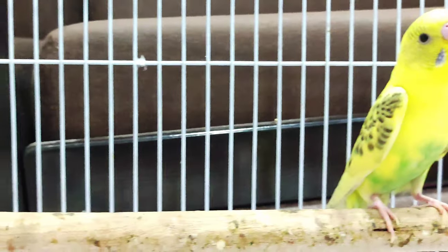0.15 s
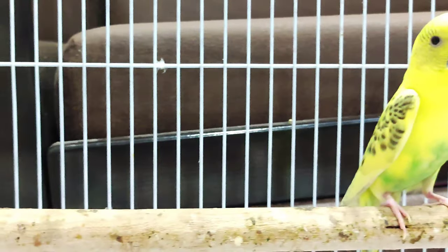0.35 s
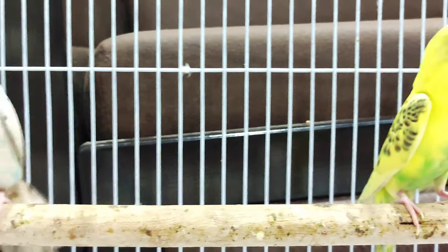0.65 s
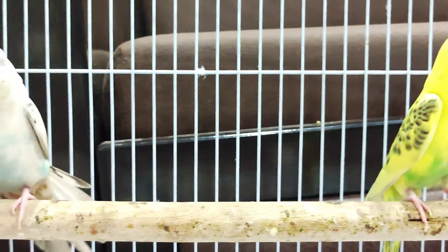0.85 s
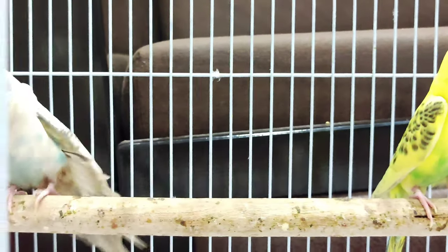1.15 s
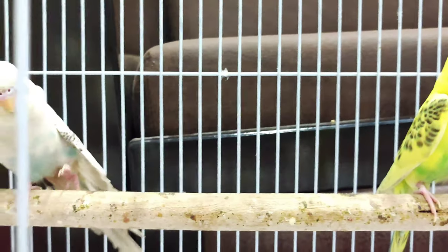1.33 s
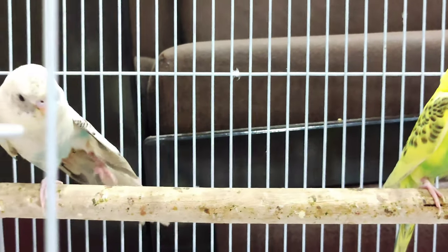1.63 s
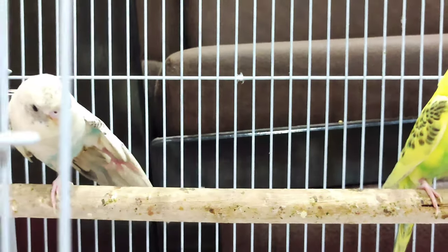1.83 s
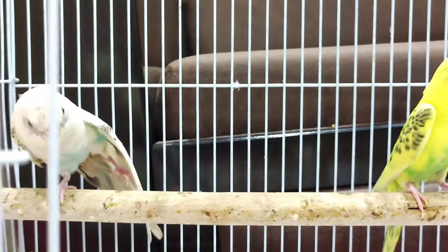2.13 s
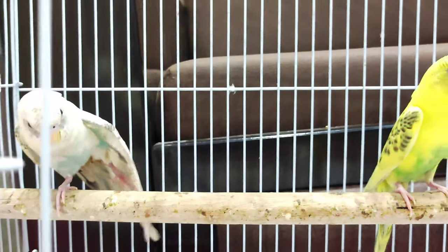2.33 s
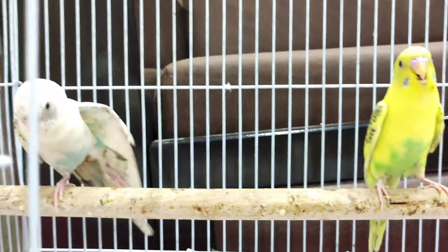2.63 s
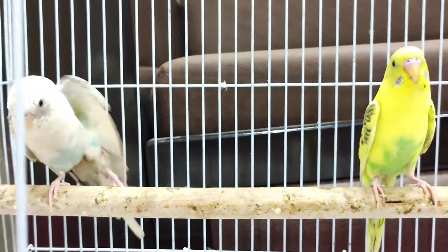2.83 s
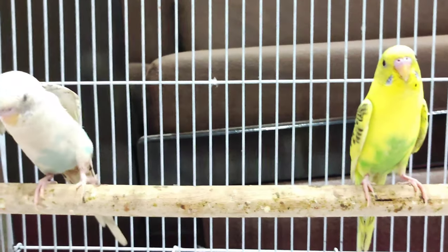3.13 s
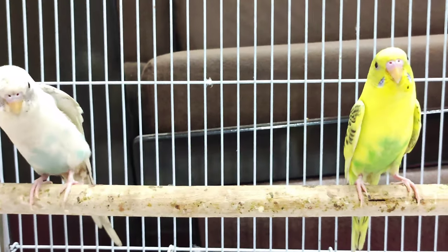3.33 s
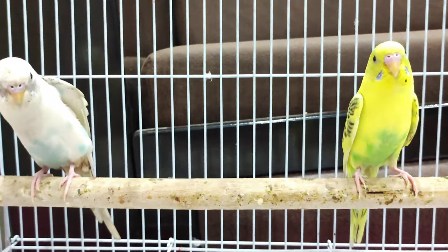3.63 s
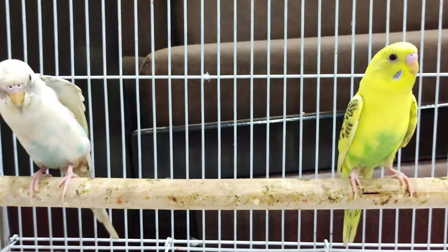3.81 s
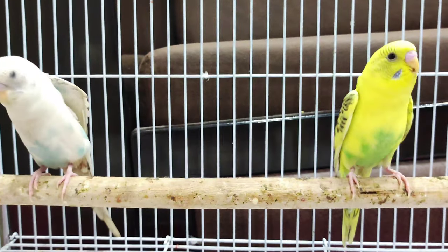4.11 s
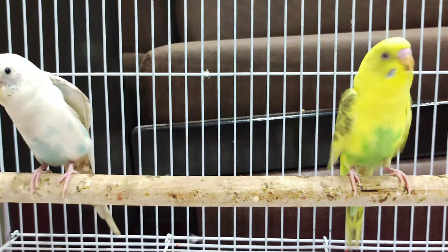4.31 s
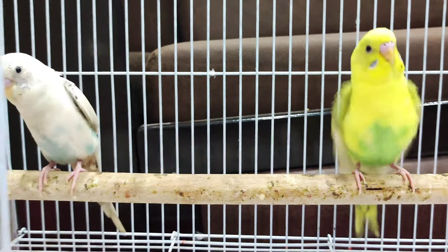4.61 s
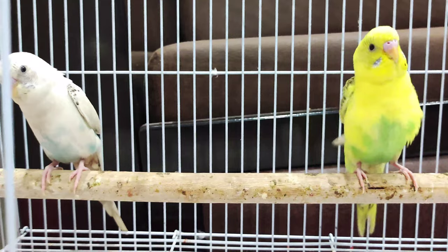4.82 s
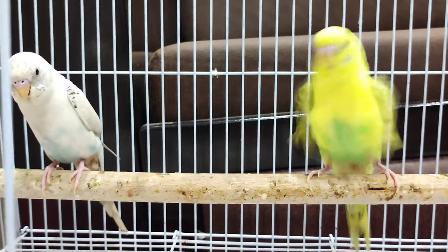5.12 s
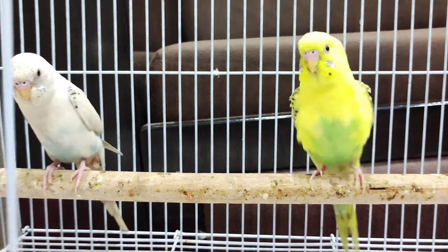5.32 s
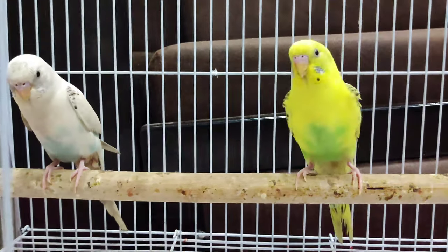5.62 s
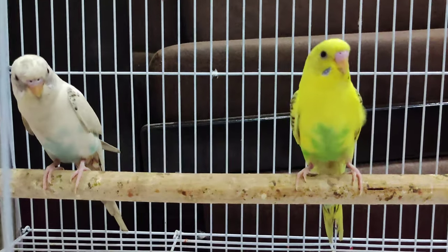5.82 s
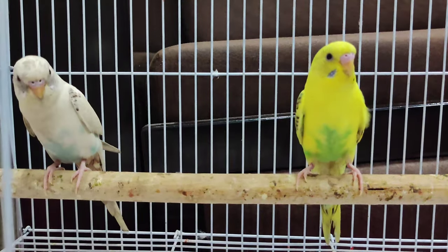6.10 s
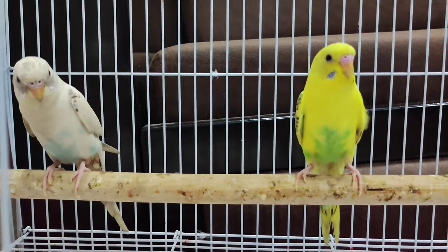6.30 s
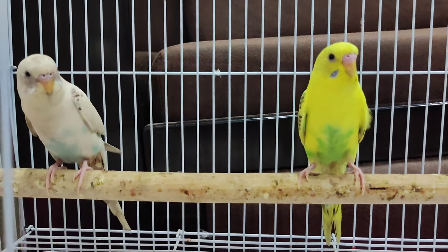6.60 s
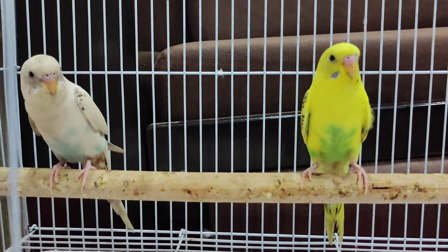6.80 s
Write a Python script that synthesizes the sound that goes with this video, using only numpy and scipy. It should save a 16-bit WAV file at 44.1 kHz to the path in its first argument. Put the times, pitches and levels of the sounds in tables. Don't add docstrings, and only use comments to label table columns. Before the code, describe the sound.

Indoors, a budgerigar in a wire cage gives five short, loud, gliding warbles close to a phone microphone: one early, two together mid-way, two more later. Fainter birds chirp from across the room. Low hum and hiss lie beneath, with dull cloth rubs, low furniture thuds and tiny claw ticks. Feathers flutter in soft hisses, and distant chatter and light brushing finish.

```python
import sys
import numpy as np
from scipy import signal
from scipy.fft import rfft, irfft, next_fast_len
from scipy.io import wavfile
from scipy.ndimage import uniform_filter1d, map_coordinates

SR = 44100
rng = np.random.default_rng(int(sys.argv[2]) if len(sys.argv) > 2 else 0)


def bounce(signal):
    frames = np.transpose(np.atleast_2d(signal))
    limited = np.clip(frames, -1, 1)
    pcm = np.round(limited * 32767).astype(np.int16)
    wavfile.write(sys.argv[1], SR, pcm)


def nominal_scale(level):
    x = np.asarray(level, float) / 20
    return 10 ** x


N = 306495


def unit(x):
    return x / np.sqrt(np.mean(x ** 2) + 1e-20)


def along(points, hz):
    f, v = np.transpose(points)
    return np.interp(np.log(hz + 1), np.log(f + 1), v)


def wobble(rate, size=N):
    knots = rng.standard_normal(int(size * rate / SR) + 4)
    return map_coordinates(knots, [np.arange(size) * rate / SR])


def patches(shape, bins, frames):
    field = uniform_filter1d(rng.standard_normal(shape), size=bins, axis=0)
    return unit(uniform_filter1d(field, size=frames, axis=1))


def filtered(x, response):
    m = next_fast_len(x.shape[-1] + SR // 4)
    return irfft(rfft(x, m) * response(np.fft.rfftfreq(m, 1 / SR)), m)[..., :x.shape[-1]]


def shaped(x, curve):
    return filtered(x, lambda hz: nominal_scale(along(curve, hz)))


def rush(spectrum, alike, patchy_db):
    z = signal.stft(rng.standard_normal((2, N)), nperseg=512)[2]
    gain = nominal_scale(patchy_db * patches(z.shape[1:], 6, 10))
    pair = signal.istft(z * gain, nperseg=512)[1][:, :N]

    def mid_side(hz):
        turn = np.arccos(np.clip(along(alike, hz), -1, 1)) / 2
        return nominal_scale(along(spectrum, hz)) * [np.cos(turn), np.sin(turn)]

    mid, side = filtered(pair, mid_side)
    return unit(np.array([mid + side, mid - side]))


def add(out, x, s):
    i = round(s * SR)
    out[:, i:i + x.shape[1]] += x[:, :N - i]


def background():
    # time in seconds, level in dB.
    hum_swell = [(0.0, -55.5), (0.29, -58.5), (0.68, -53), (1.57, -57.5), (2.69, -55.5), (3.48, -59.5),
                 (5.92, -55), (6.95, -57)]
    # frequency in Hz, density in dB per Hz.
    hum_tone = [(12, -37.5), (20, -8), (27, -2.5), (53, -2.5), (75, -12.5), (107, -0.5), (141, -8),
                (182, 1.5), (203, -7.5), (222, -14.5), (282, -8.5), (451, -33), (600, -28.5), (780, -43.5),
                (1320, -120)]
    hiss_tone = [(240, -42.5), (400, -6.5), (438, -13.5), (612, -13.5), (854, -16), (1190, -16.5),
                 (1270, -19.5), (2220, -19), (3290, -22.5), (4460, -25.5), (6610, -28.5), (13700, -23),
                 (14800, -44.5)]
    # frequency in Hz, likeness from 0 to 1.
    likeness = [(30, 0.43), (60, 0.55), (180, 0.9), (350, 0.63), (700, 0.0015), (1650, 0), (5000, 0.029)]
    swell = nominal_scale(np.interp(np.arange(N) / SR, *np.transpose(hum_swell)))
    hum = swell * nominal_scale(2.5 + 0.51 * wobble(54)) * rush(hum_tone, likeness, patchy_db=-2.5)
    hiss_db = -63 + 0.45 * wobble(3.6)
    return hum + nominal_scale(hiss_db) * rush(hiss_tone, likeness, patchy_db=-4.5)


def contact_call(db, pitch_hz, rhythm, accents, bends=(0, 0, 0, 0)):
    warble_hz, held_hz, low_hz = pitch_hz
    slide, dip, arch, held, low = rhythm
    slide_db, dip_db, held_db, low_db, rise_db = accents
    crack, stroke, rise, pause = .004, .007, .023, .004
    flight = arch * np.array([0, .5, 1])
    arch_hz = warble_hz + 90e3 * flight - 4.9e6 * flight ** 2
    hz = [np.add((3200, 2860, 2537), [*bends[:2], 0]),
          warble_hz + np.array((1300, 750, 350)),
          warble_hz + np.array((280, -120, 0)),
          arch_hz,
          np.linspace(3900, held_hz, 3),
          held_hz - 70 * np.array([1, 0, 1]),
          [1990, low_hz, low_hz],
          np.add((2796, 3200, 3606), [0, *bends[2:]])]
    length = np.array([slide, crack, dip - crack, arch, stroke, held - stroke, low, rise])
    slot = length + pause * np.array([0, 0, 0, 1, 0, 0, 1, 0])
    gain_db = db + np.array([slide_db, -12, dip_db, 0, -3, held_db, low_db, rise_db])
    return np.column_stack([np.cumsum(slot) - slot, length, hz, gain_db])


def glides(rows, s):
    start, length, a, b, db = np.transpose(rows)
    return np.column_stack([start - s, length, a, (a + b) / 2, b, db])


def warble(notes, rasp, overtone_db, sheen_db):
    reed = [0, -23, -44, -34, -44]
    # frequency in Hz, gain in dB.
    throat = [(1000, -46), (1900, -39), (2150, -28), (2450, -3), (3600, 0), (4300, -2), (5200, 0),
              (6200, -5), (7200, -10), (10500, -12), (13500, 1), (15000, -4)]
    # frequency in Hz, density in dB per Hz.
    breath_tone = [(530, -66), (900, -40.5), (1460, -24.5), (1580, -41.5), (1810, -23.5), (2370, -8),
                   (2730, -17.5), (3150, -9), (3640, -16.5), (4710, -12.5), (10500, -53.5), (13600, -78.5),
                   (22000, -120)]
    # frequency in Hz, gain in dB.
    sheen_tone = [(4000, -50), (5500, -36), (8000, 3), (10000, -7), (11000, -14), (12200, 9.5),
                  (13500, 7.5), (14300, 0.5), (15000, -34)]
    tone, breath = np.zeros(SR), np.zeros(SR)
    order = np.arange(1, len(reed) + 1)[:, None]
    first = notes[0][0]
    for s, length, *hz, db in notes:
        n, i = int(length * SR), int(s * SR)
        u = np.arange(n) / n
        rough = rasp * (1 + 1.1 * (hz[1] < 2300))
        glide = np.polyval(np.polyfit([0, .5, 1], hz, 2), u)
        pitch = glide * (1 + .06 * rough * wobble(500, size=n))
        second_db = overtone_db - 6.5 * (s > first and hz[1] > 2300)
        gains = nominal_scale(np.array(reed)[:, None] + along(throat, order * pitch) + second_db * (order == 2))
        voice = (gains * np.sin(order * 2 * np.pi * np.cumsum(pitch) / SR)).sum(0)
        edge = np.clip(np.minimum(u / .12, (1 - u) * length / .001), 0, 1)
        effort = nominal_scale(db + 2.2 * wobble(90, size=n) + 10 * rough * wobble(600, size=n)) * edge
        tone[i:i + n] += unit(voice) * effort
        snap = 1 + 3 * np.exp(-u * length / 0.005) * (hz[0] > 3850)
        opening = np.clip(.25 + (s - first + u * length) / .05, 0, 1)
        breath[i:i + n] += effort * snap * (rough / rasp) * opening
    air = unit(shaped(rng.standard_normal(SR), breath_tone))
    z = signal.stft(rng.standard_normal(SR), nperseg=256)[2]
    mottled = signal.istft(z * nominal_scale(5 * patches(z.shape, 10, 14)), nperseg=256)[1][:SR]
    sheen = unit(shaped(mottled, sheen_tone))
    lingering = signal.lfilter([.002], [1, .002 - 1], breath)
    return tone + rasp * air * uniform_filter1d(breath, size=60) + nominal_scale(sheen_db) * sheen * lingering


def place(x, pan_db, lead_ms):
    side = np.array([[1], [-1]])
    return filtered(x, lambda hz: nominal_scale(side * pan_db / 2) * np.exp(1j * np.pi * hz * side * lead_ms / 1000))


def room(x, wet_db):
    # frequency in Hz, time to fall 60 dB in seconds.
    ring_time = [(500, 0.2), (2000, 0.84), (3500, 0.51), (6000, 0.73), (9000, 0.34), (13000, 0.32)]
    # delay in seconds, level in dB.
    echoes = [(.0023, -2), (.0051, 0), (.0087, -2), (.0132, -1), (.019, -4), (.027, -5)]
    hz, t, z = signal.stft(rng.standard_normal((2, SR * 3 // 4)), SR, nperseg=256)
    decay = nominal_scale(-60 * t / along(ring_time, hz)[:, None]) * np.clip(t / 0.017, 0, 1)
    tail = signal.istft(z * decay, SR, nperseg=256)[1]
    tail = tail / np.linalg.norm(tail[0])
    delay, db = np.transpose(echoes)
    for side in tail:
        at = np.abs(delay * SR * rng.uniform(.8, 1.2, len(db))).astype(int)
        side[at] += nominal_scale(db) * rng.choice([-1, 1], len(db))
    return nominal_scale(wet_db) * signal.fftconvolve(x[None], tail, axes=1)[:, :len(x)]


def far_birds():
    # start in seconds, arch level in dB, tempo, stress on the held note in dB, left-right in dB.
    far_calls = [
        (.022, -43, 0.62, 5, -5),
        (.27, -46.5, 0.62, 4.1, -5.5),
        (1.043, -45, 0.67, 4.5, -5),
        (2.173, -46.5, 0.67, 9.5, -4.5),
        (2.404, -48.5, 0.66, 6.5, -5),
        (4.074, -46.5, 0.73, 5.5, -6),
    ]
    # start in seconds, length in seconds, start pitch in Hz, end pitch in Hz, level in dB.
    tunes = [
        [(1.225, 0.029, 3215, 2560, -48), (1.262, 0.022, 3553, 3330, -36), (1.3, 0.012, 3200, 2860, -48),
         (1.328, 0.015, 3575, 3620, -40)],
        [(2.31, 0.21, 5060, 5000, -57), (2.45, 0.082, 4740, 5300, -77), (2.49, 0.037, 3020, 3043, -71)],
        [(5.998, 0.047, 3116, 2765, -47), (6.05, 0.029, 3200, 3120, -39.5), (6.075, 0.033, 3500, 3900, -48),
         (6.102, .026, 3027, 2960, -33), (6.13, 0.038, 3800, 3756, -45), (6.56, 0.035, 3070, 2950, -64)],
    ]
    # overtone in dB, direct share in dB, left lead in ms.
    tune_paths = [(13, -12, .4), (-9, -15, .4), (3, -2, -.03)]
    # frequency in Hz, gain in dB.
    distance = [(1500, -7.5), (2500, -1), (4000, -6), (4500, -18.5), (5200, -4), (6000, -9), (7300, 13),
                (8300, -14), (12000, -35)]
    pitch_hz, rhythm = (3515, 3051, 1930), (0.079, .034, 0.013, 0.043, 0.04)
    out, calls = np.zeros((2, N)), []
    for s, db, tempo, stress_db, pan_db in far_calls:
        accents = np.add((1.5, 9, 2.85, -10, -2), [0, 0, stress_db, 0, 0])
        notes = contact_call(db, pitch_hz, rhythm, accents)
        calls.append((s, notes * [tempo, tempo, 1, 1, 1, 1], pan_db, 13, -15, .4))
    for tune, path in zip(tunes, tune_paths):
        s = tune[0][0]
        calls.append((s, glides(tune, s), -3.5, *path))
    for s, notes, pan_db, overtone_db, direct_db, lead_ms in calls:
        dry = shaped(warble(notes, 0.24, overtone_db, sheen_db=-18.0), distance)
        direct = nominal_scale(direct_db) * place(dry, pan_db, lead_ms)
        add(out, direct + nominal_scale([[pan_db / 2], [-pan_db / 2]]) * room(dry, wet_db=-4), s)
    return out


def near_bird():
    # start in seconds, arch level in dB, warble, held and low pitch in Hz.
    near_calls = [
        (0.584, -11.5, 3474, 3048, 1930),
        (2.771, -11.5, 3357, 2800, 2061),
        (3.061, -10.5, 3443, 2883, 1766),
        (4.391, -9.5, 3212, 2755, 1976),
        (4.721, -10, 3363, 2668, 1820),
    ]
    # slide, dip, arch, held and low note in seconds.
    rhythms = [(.044, .026, .019, .027, .033), (.048, .029, .016, .034, .042),
               (.046, .025, .022, .021, .033), (.042, .026, .027, .023, .032),
               (.055, .02, .025, .024, .042)]
    # slide, dip, held, low and rise in dB.
    accent_rows = [(-5, 4, -2.5, -7, -1), (-4.5, 4.5, -2.5, -13, -6), (-2, 2, -2.5, -4, -4.5),
                   (-9, 4.5, -1.2, -11, -16), (-4.5, -1.1, -5.5, -7.9, -2.5)]
    # bend of slide start, slide middle, rise middle and rise end in Hz.
    bend_rows = [(-80, 110, 420, -100), (0, 60, -120, -60), (-150, 70, 0, -80), (40, -130, 0, -200),
                 (80, -80, -80, 350)]
    # left-right in dB, left lead in ms, rasp 0-1, overtone in dB, thin hiss in dB.
    facing = [(.5, .465, .13, 9, -21), (-1.5, .45, .08, -1, -17), (-1, .185, .11, -3, -18),
              (-1, .455, .08, -1, -23), (0, .2, .09, -3, -19)]
    # start in seconds, length in seconds, start pitch in Hz, end pitch in Hz, level in dB.
    trail = [
        (3.243, .017, 2530, 2570, -26),
        (3.268, .027, 1430, 1270, -41),
    ]
    lead_in = .03
    out = np.zeros((2, N))
    for call, rhythm, accents, bends, stance in zip(near_calls, rhythms, accent_rows, bend_rows, facing):
        s, db, *pitch_hz = call
        pan_db, lead_ms, *voice = stance
        notes = contact_call(db, pitch_hz, rhythm, accents, bends)
        if s < trail[0][0] < s + .3:
            notes = np.vstack([notes, glides(trail, s)])
        dry = warble(notes + [lead_in, 0, 0, 0, 0, 0], *voice)
        add(out, place(dry, pan_db, lead_ms) + room(dry, wet_db=-15.5), s - lead_in)
    return out


def strokes(rows, sag_db_per_s):
    s, rise, hold, fall, db = np.transpose(rows)[:, :, None]
    t = np.arange(N) / SR - s
    fade = np.maximum(np.maximum(-t / rise, (t - hold) / fall), 0)
    return nominal_scale(db - 25.5 * fade - sag_db_per_s * np.clip(t, 0, hold)).sum(0)


def cloth():
    # full strength at seconds, rise, hold and fall in seconds, level in dB.
    rubs = [
        (.7, 0.051, 0.02, 0.17, -50),
        (2.8, .05, 0.19, 0.16, -57),
        (3.19, 0.15, 0.022, 0.44, -57.5),
        (3.4, 0.28, 0.22, 0.14, -62),
        (4.28, 0.69, 0.022, 0.23, -62),
        (4.46, 0.19, 0.1, 0.1, -55.5),
        (4.73, 0.098, 0.487, 0.071, -53),
        (5.66, .04, .03, .35, -63.5),
        (6.2, 0.23, 0.093, 0.36, -55),
    ]
    # frequency in Hz, density in dB per Hz.
    cloth_tone = [(210, -56), (350, -15.5), (568, -6), (771, -11), (1320, -9), (1700, -16.5), (2400, -19),
                  (3120, -65.5), (5280, -120)]
    drag = strokes(rubs, 14) * nominal_scale(-0.5 + 1.2 * wobble(27))
    return drag * rush(cloth_tone, [(1000, 0.26)], patchy_db=4.5)


def thuds():
    # start in seconds, level in dB, pitch in Hz, time to fall 60 dB in seconds.
    blows = [
        (.7, -44.5, 48.3, 0.42),
        (1.299, -41, 300, 0.22),
        (1.935, -27.5, 154, 0.36),
        (2.38, -28.5, 56.7, 0.082),
        (4.78, -36, 49.6, 0.17),
        (5.101, -38.5, 151, 0.34),
        (5.82, -54, 360, 0.57),
    ]
    # frequency in Hz, gain in dB.
    hard_tone = [(150, -6), (300, 5.5), (600, 0), (900, -13), (1500, -27), (2500, -49)]
    out, t = np.zeros((2, N)), np.arange(SR // 2) / SR
    for s, db, hz, t60 in blows:
        decay = nominal_scale(db - 60 * t / t60 + 1.6 * wobble(30, size=len(t)))
        ring = np.sin(2 * np.pi * hz * t) * decay * (1 - np.exp(-t / 0.02))
        add(out, np.array([ring, ring]), s)
    hard = unit(shaped(rng.standard_normal((2, len(t))), hard_tone))
    add(out, hard * nominal_scale(-31 - 60 * t / 0.2) * (1 - np.exp(-t / 0.016)), 1.922)
    return out


def claw_ticks():
    # start in seconds, peak in dB.
    ticks = [
        (2.714, -42.5),
        (5.1078, -39),
        (5.656, -48.5),
        (5.7694, -47),
    ]
    out, t = np.zeros((2, N)), np.arange(SR // 2) / SR
    for s, db in ticks:
        bright = np.diff(rng.standard_normal((2, len(t) + 1)))
        add(out, nominal_scale(db + 2.0 - 60 * t / 0.0079) * bright, s)
    return out


def feathers():
    # full strength at seconds, rise, hold and fall in seconds, level in dB.
    ruffles = [
        (3.52, 0.41, 0.049, 0.25, -55.5),
        (3.83, 0.044, 0.057, 0.12, -53.5),
        (4.19, 0.074, 0.36, 0.041, -55.5),
        (4.695, 0.03, 0.026, 0.024, -46),
        (5.11, 0.27, 0.082, 0.045, -57.5),
        (5.26, 0.059, 0.24, 0.14, -49),
        (5.68, 0.12, 0.1, 0.062, -65.5),
        (6.24, 0.32, .19, 0.14, -66.5),
    ]
    # frequency in Hz, density in dB per Hz.
    feather_tone = [(590, -40.5), (1000, -14), (3070, 1.5), (3600, -2), (4890, -3.5), (8040, -5),
                    (9320, -6.5), (13700, -9.5), (14500, -12), (15000, -73.5)]
    flutter = strokes(ruffles, 1) * nominal_scale(3.5 + 0.6 * wobble(40))
    return flutter * rush(feather_tone, [(3000, 0.043)], patchy_db=2.9)


def brushing():
    # full strength at seconds, rise, hold and fall in seconds, level in dB.
    brushes = [
        (6.17, 0.11, 0.15, .12, -54.5),
        (6.4, .1, 0.077, .04, -65),
    ]
    # frequency in Hz, density in dB per Hz.
    brush_tone = [(500, -29), (900, -6), (1300, 0), (1600, -6), (2300, -22), (3200, -59.5)]
    drag = strokes(brushes, 14) * nominal_scale(2.2 * wobble(35))
    return drag * rush(brush_tone, [(1000, 0.3)], patchy_db=1.0)


def scene():
    birds = far_birds() + near_bird()
    handling = cloth() + thuds() + claw_ticks() + feathers() + brushing()
    return background() + birds + handling


def band_limit(x):
    return signal.sosfilt(signal.butter(12, 15600, fs=SR, output="sos"), x)


def record(dry):
    # frequency in Hz, gain in dB.
    capsule = [(7500, 1), (8600, -5), (10000, -9), (10800, -11), (11600, -4), (13000, -1.5)]
    bent = dry + 0.018 * dry ** 2
    coloured = filtered(bent, lambda hz: nominal_scale(along(capsule, hz)) * hz ** 2 / (hz ** 2 + 30 ** 2))
    rounded = coloured / (1 + np.abs(coloured / .7) ** 6) ** (1 / 6)
    heard = filtered(rounded, lambda hz: 1 / (1 + (hz / 14550) ** 160))
    return band_limit(heard)


dry = scene()
out = record(dry)
bounce(out)
```